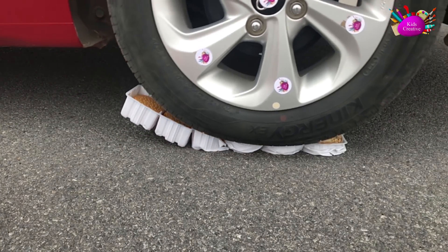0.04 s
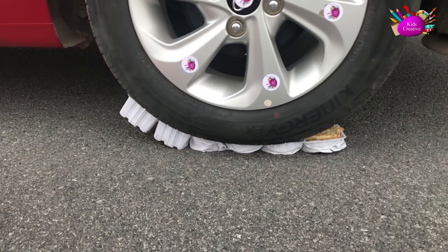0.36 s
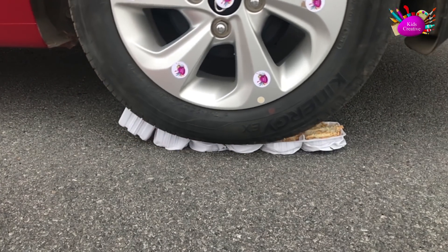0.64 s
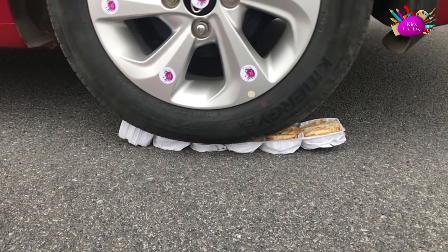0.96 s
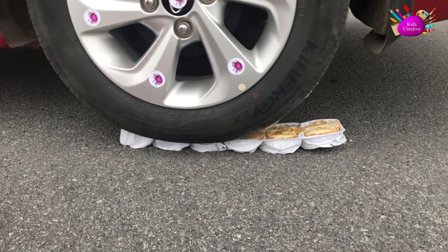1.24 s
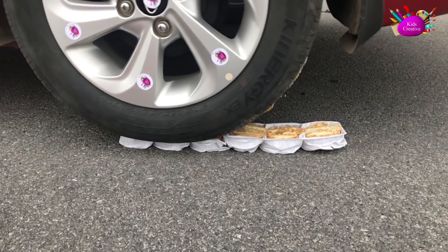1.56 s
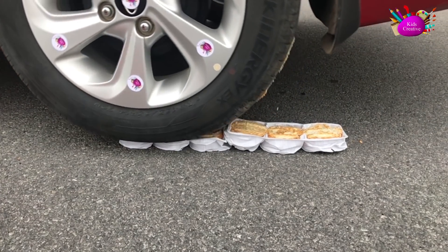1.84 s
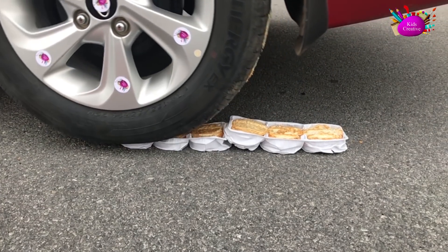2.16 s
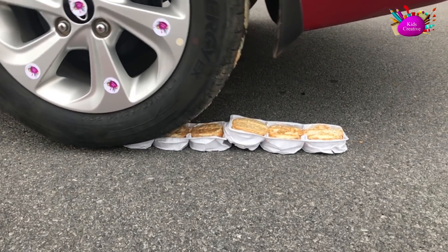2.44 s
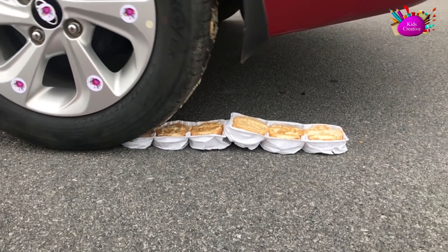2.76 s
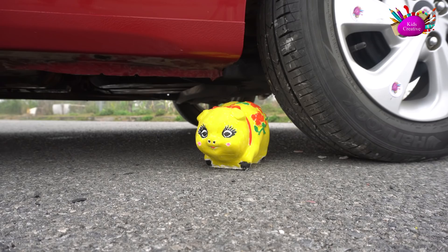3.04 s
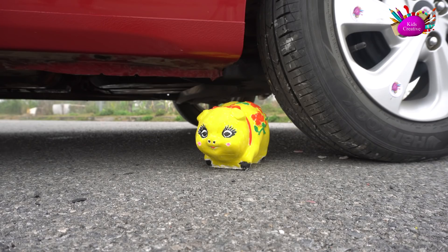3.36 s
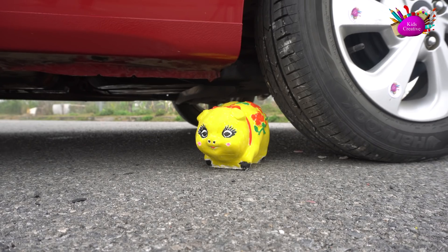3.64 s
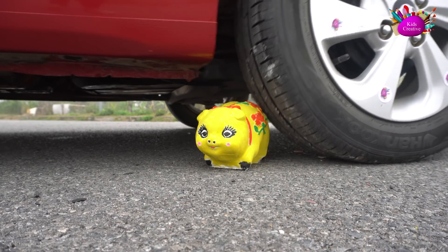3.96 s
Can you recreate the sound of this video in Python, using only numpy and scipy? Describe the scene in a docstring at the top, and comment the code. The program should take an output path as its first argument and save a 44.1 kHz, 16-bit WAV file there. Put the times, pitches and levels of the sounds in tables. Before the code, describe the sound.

A car tyre crushes plastic trays with dull pops and crackles, before a nearby engine idles.

```python
"""Filled plastic trays crush under a slow car tyre on asphalt, heard dull and in mono.
Tray walls buckle with hollow pops, film cracks and crumples over a faint engine throb,
and the crackle thins as the tyre rolls off. Then an abrupt cut to the car idling close by,
bright and in stereo: clatter and hiss ring the engine bay, with one sharp tick."""
import sys
import numpy as np
from scipy import signal
from scipy.fft import rfft, irfft
from scipy.io import wavfile
from scipy.ndimage import uniform_filter1d

SR = 44100
rng = np.random.default_rng(int(sys.argv[2]) if len(sys.argv) > 2 else 0)


def transcribe(signal):
    """Save signal, clipped to [-1, 1], as a 16-bit WAV file at the path in sys.argv[1]."""
    frames = np.atleast_2d(signal).T
    limited = np.clip(frames, -1, 1)
    pcm = np.round(limited * 32767).astype(np.int16)
    wavfile.write(sys.argv[1], SR, pcm)


N = 176400
CUT_S, DULL_HZ, BANDWIDTH_HZ = 3.1095, 4720, 15900

# engine while rolling: freq_hz, gain_db
RUMBLE_SPECTRUM = [(8, -6.5), (25, 0.5), (40, -10), (60, -13.5), (90, -13), (130, -24.5), (220, -17),
                   (330, -23), (600, -30.5), (1200, -38), (4700, -45)]
# engine at idle: freq_hz, gain_db
IDLE_SPECTRUM = [(20, -36), (40, -22), (65, -3.5), (95, -7), (160, -8.5), (250, -3), (370, -3), (560, -3),
                 (780, 1.5), (1020, -3.5), (1300, -4.5), (1800, -3), (2100, -9.5), (2800, -13.5),
                 (4600, -16.5), (5500, -22), (10000, -24), (15500, -29.5)]
# engine bay resonances: freq_hz, half_width_hz, relative_db
BAY_MODES = [(98, 8, -49), (304, 8, -42), (447, 8, -47), (614, 12, -48), (732, 10, -39), (865, 10, -40),
             (918, 12, -44), (1226, 16, -49), (1334, 24, -46), (1536, 26, -44), (1668, 26, -42),
             (1766, 20, -43), (1830, 26, -44)]
# left-right likeness of the idle: freq_hz, coherence
IDLE_COHERENCE = [(130, 1), (300, 0.99), (640, 0.86), (1000, 0.73), (1500, 0.15), (3000, 0.1), (7000, 0.15),
                  (15000, 0.4)]
# idle balance: freq_hz, left_minus_right_db
IDLE_BALANCE = [(200, 0), (500, 0), (800, 4), (1600, 8), (2100, 3.5), (5000, 3.5), (15000, 1.5)]
# idle phase: freq_hz, left_lead_rad
IDLE_PHASE = [(100, 0.039), (950, 0.077), (1700, 0.91), (2500, 0.74), (5000, 2.4), (9000, 0.57)]
# onset of the tick: freq_hz, gain_db
SNAP_SPECTRUM = [(300, -15), (1200, 2), (2500, 8), (5000, -10), (11000, -12), (16000, -19)]
# steady crushing: time_s, crumple_db, crackle_db
CRUSH_LEVELS = [(0, -45.5, -45.5), (0.149, -37.5, -44.5), (.3, -39, -47), (0.421, -42.5, -42.5),
                (.65, -35.5, -46), (0.799, -43.5, -45.5), (.9, -37.5, -45.5), (1.04, -42.5, -48.5),
                (1.12, -39.5, -45.5), (1.35, -42, -45), (1.52, -40.5, -47.5), (1.65, -43.5, -46.5),
                (1.8, -52, -48.5), (2.129, -49.5, -48), (2.28, -47.5, -51), (2.36, -59, -52),
                (2.5, -58.5, -55.5), (2.8, -57, -61.5), (3.1, -55.5, -65)]
# low crumple: freq_hz, gain_db
CRUMPLE_SPECTRUM = [(40, -18), (85, -9), (150, -3), (250, 1.5), (450, -3), (800, -6.5), (1200, -15.5),
                    (1600, -9.5), (2500, -27.5), (4700, -48.5)]
# fine crackle: freq_hz, gain_db
CRACKLE_SPECTRUM = [(300, -17.5), (900, 1), (1600, 0), (2400, 0.5), (3500, 3), (4600, 4.5)]
# trays folding: start_s, length_s, pitch_hz, peak_rms_db
TRAY_FOLDS = [(0.127, 0.047, 334, -39.5), (0.19, 0.029, 600, -35.5), (.41, 0.026, 453, -34.5),
              (0.437, 0.035, 263, -32.5), (.51, 0.039, 597, -35.5), (0.563, 0.064, 470, -38),
              (0.848, 0.049, 690, -37.5), (0.896, 0.048, 670, -35.5), (1.087, 0.058, 260, -34),
              (1.369, 0.049, 365, -34.5), (1.424, 0.035, 430, -30), (1.606, 0.032, 600, -38),
              (1.686, 0.038, 400, -41.5), (1.84, 0.057, 603, -43.5), (2.198, 0.067, 650, -37.5)]
# film cracking: freq_hz, gain_db
CRACK_SPECTRUM = [(200, -11.5), (700, -4.5), (1600, 2), (2500, -4), (3600, -1), (4700, -1)]
# walls buckling: start_s, pitch_hz, pop_relative_db, decay_ms, crack_hz, crack_relative_db
WALL_BUCKLES = [(0.023, 410, -31.5, 2.7, 4100, -29.5), (0.088, 940, -24, 2.6, 1700, -38),
                (0.143, 1084, -25.5, 3.2, 3000, -26), (0.16, 960, -27, 1.7, 1700, -30),
                (0.183, 344, -15.5, 3.6, 2100, -41), (0.19, 1020, -20, 1.7, 1300, -20.5),
                (0.209, 1100, -29, 2, 1900, -28), (0.24, 426, -21.5, 8.7, 1400, -39),
                (0.276, 1114, -21, 1.6, 1600, -15), (0.299, 330, -19.5, 2, 1600, -21),
                (0.328, 278, -18, 3.2, 1500, -25.5), (0.406, 690, -15, 0.89, 1300, -21),
                (0.4857, 776, -16.5, 1.1, 1700, -15), (0.521, 670, -31.5, 1.6, 1700, -23),
                (0.558, 394, -15.5, 3.4, 2800, -21.5), (0.598, 507, -17, 2.7, 3300, -29.5),
                (0.633, 704, -29, 3, 1600, -15.5), (0.72, 248, -16, 6.7, 1700, -26.5),
                (0.75, 407, -34.5, 2, 1500, -26.5), (0.837, 680, -16.5, 1.7, 1500, -37),
                (0.911, 665, -19, 3.1, 1900, -28), (0.973, 1030, -29.5, 3.1, 1400, -37),
                (1.013, 428, -15.5, 3.7, 1400, -42), (1.063, 360, -33, 4.5, 1800, -46),
                (1.081, 292, -13, 3.6, 4400, -27.5), (1.136, 257, -32, 2, 3500, -20.5),
                (1.177, 450, -46, 1.9, 4400, -29), (1.208, 954, -28, 2.4, 3500, -34),
                (1.231, 300, -26.5, 3.2, 1500, -27), (1.268, 271, -21, 6.3, 1700, -20),
                (1.337, 319, -29, 3.2, 1700, -22), (1.363, 320, -20, 5.7, 1600, -33),
                (1.416, 480, -21, 2, 4400, -24), (1.5, 330, -25.5, 2, 1600, -30.5),
                (1.592, 338, -20, 3.9, 3100, -31), (1.605, 536, -27, 4, 2500, -33),
                (1.673, 348, -14.5, 4.6, 1600, -40), (1.871, 840, -22, 0.89, 1400, -35),
                (1.908, 676, -26.5, 2.5, 3900, -33.5), (2.015, 656, -24, 3, 1300, -37),
                (2.026, 580, -34, 1.3, 4300, -29), (2.054, 500, -19, 2, 4400, -51),
                (2.121, 1030, -31, 3.7, 4400, -42), (2.161, 446, -25, 2.7, 1600, -46),
                (2.202, 940, -32, 2.3, 1600, -30), (2.271, 1590, -27.5, 1.4, 4300, -23),
                (2.489, 890, -56, 1.5, 3900, -35), (2.647, 1200, -48, 1.7, 1400, -47),
                (2.705, 900, -56, 2, 4200, -32.5), (2.73, 1060, -29.5, 2.1, 1300, -35),
                (2.82, 560, -40, 2.6, 3800, -41), (2.962, 700, -44, 1.9, 3900, -41),
                (3.014, 930, -41.5, 1.6, 1600, -38), (3.086, 1440, -51, 2, 2900, -28)]


def amp(db):
    return 10 ** (np.asarray(db) / 20)


def unit_rms(x):
    return x / np.sqrt(np.mean(x ** 2) + 1e-20)


def curve_at(points, hz):
    """Interpolate over log frequency."""
    freq_hz, value = np.transpose(points)
    return np.interp(np.log(hz + 1), np.log(freq_hz + 1), value)


def add(mix, start_s, sound):
    part = mix[max(round(start_s * SR), 0):][:len(sound)]
    part += sound[:len(part)]


def colour(x, spectrum):
    """Minimum-phase filter of unit energy."""
    size = 4096
    log_gain = np.log(amp(curve_at(spectrum, abs(np.fft.fftfreq(size, 1 / SR)))))
    response = np.exp(np.conj(signal.hilbert(log_gain)))
    taps = np.fft.ifft(response).real[:size // 2]
    return signal.fftconvolve(x, taps / np.linalg.norm(taps))[:len(x)]


def resonate(x, hz, q):
    return signal.lfilter(*signal.iirpeak(hz, q, SR), x)


def lowpass(channels, hz):
    taps = signal.firwin(601, hz, window=("kaiser", 8), fs=SR)
    return signal.oaconvolve(channels, taps[None], "same", axes=1)


def dull_unit_rms(x):
    return unit_rms(lowpass(x[None], DULL_HZ)[0])


def clicks(samples, per_s, spread_db):
    """Random impulses of either sign, exponentially distributed in dB."""
    chance, size, sign = rng.random((3, samples))
    level_db = spread_db * np.minimum(-np.log(1 - size), 5)
    return (chance < per_s / SR) * np.sign(sign - .5) * amp(level_db)


def burst(x, envelope):
    """Give x the envelope's shape and energy."""
    shaped = x * envelope
    return shaped * np.linalg.norm(envelope) / (np.linalg.norm(shaped) + 1e-12)


def wander(step_s):
    """Random drift of unit rms."""
    knots = rng.standard_normal(N // 64)
    return unit_rms(np.interp(np.arange(N) / SR / step_s, np.arange(len(knots)), knots))


def engine_rumble():
    """The engine throbs faintly while the car creeps."""
    gain = amp(curve_at(RUMBLE_SPECTRUM, np.fft.rfftfreq(N, 1 / SR)))
    noise = irfft(rfft(rng.standard_normal(N)) * gain, N)
    throb_hz = 22.5 * (1 + 0.079 * wander(step_s=.12))
    throb = np.sin(2 * np.pi * np.cumsum(throb_hz) / SR)
    return amp(-48) * unit_rms(noise) + amp(-45) * throb


def engine_idle():
    """Quick regular clatter and fluttering hiss excite the engine bay; stereo."""
    clatter_hz, decay_cycles, flutter_db = 79.8, 0.083, 1.04
    t, hz = np.arange(N) / SR, np.fft.rfftfreq(N, 1 / SR)
    beats = 1 + 0.95 * np.exp(-(t * clatter_hz % 1) / decay_cycles)
    flutter = amp(flutter_db * unit_rms(uniform_filter1d(rng.standard_normal(N), size=700)))
    clatter = rfft(unit_rms(rng.standard_normal((2, N)) * beats))
    hiss = rfft(unit_rms(rng.standard_normal((2, N)) * flutter))
    clatter_share = curve_at([(150, 0.076), (600, 1), (2000, 0.84), (5000, 0.21)], hz)
    left, independent = np.sqrt(clatter_share) * clatter + np.sqrt(1 - clatter_share) * hiss
    power = (amp(-27) * unit_rms(amp(curve_at(IDLE_SPECTRUM, hz)))) ** 2
    for mode_hz, half_width_hz, relative_db in BAY_MODES:
        peak = 1 / (1 + ((hz - mode_hz) / half_width_hz) ** 2)
        power += (amp(relative_db + 1) * unit_rms(peak)) ** 2
    coherence = curve_at(IDLE_COHERENCE, hz)
    right = coherence * left + np.sqrt(1 - coherence ** 2) * independent
    right *= np.exp(-1j * curve_at(IDLE_PHASE, hz))
    lean = amp(curve_at(IDLE_BALANCE, hz) / 2)
    return irfft(np.sqrt(power) * np.array([left * lean, right / lean]), N)


def tick():
    """One sharp tick, like grit snapping under the tread, and its quick reflection."""
    start_s, echo_delay_s = 3.901, .0092
    ring_hz, ring_decay_s, snap_decay_s = 1160, .0032, .0005
    out, t = np.zeros((2, N)), np.arange(SR // 20) / SR
    ring = amp(-15) * np.sin(2 * np.pi * ring_hz * t) * np.exp(-t / ring_decay_s)
    for side, gain in zip(out, amp([2, -2])):
        noise = colour(rng.standard_normal(len(t)), SNAP_SPECTRUM)
        snap = amp(-12) * burst(noise, np.exp(-t / snap_decay_s))
        add(side, start_s, gain * (ring + snap))
        add(side, start_s + echo_delay_s, gain * amp(-7) * ring)
    return out


def underbody(x):
    """Add short reflections between road and car floor."""
    gap_s, t60_s = .003, 0.15
    t = np.arange(SR // 4) / SR
    tail = clicks(len(t), per_s=2000, spread_db=3.5) * amp(-60 * t / t60_s) * (t > gap_s)
    return x + amp(-11.5) * signal.fftconvolve(x, tail / np.linalg.norm(tail))[:N]


def crushing():
    """Film and grit crumple and crackle under the tread in small flurries."""
    time_s, crumple_db, crackle_db = np.transpose(CRUSH_LEVELS)
    t = np.arange(N) / SR
    flurry = amp(1.5 * wander(step_s=.008))
    crumple = colour(flurry * clicks(N, per_s=1700, spread_db=3.5), CRUMPLE_SPECTRUM)
    crackle = colour(flurry * clicks(N, per_s=5000, spread_db=2), CRACKLE_SPECTRUM)
    return (dull_unit_rms(crumple) * amp(np.interp(t, time_s, crumple_db))
            + dull_unit_rms(crackle) * amp(np.interp(t, time_s, crackle_db)))


def tray_scrunches():
    """Runs of small slips ring the hollow of a folding tray."""
    out = np.zeros(N)
    for start_s, length_s, pitch_hz, peak_rms_db in TRAY_FOLDS:
        slips = clicks(SR // 8, per_s=1500, spread_db=1.0)
        hollow = resonate(resonate(slips, pitch_hz, q=1.4), pitch_hz, q=0.44)
        progress = np.minimum(np.arange(len(slips)) / SR / length_s, 1)
        swell = np.sqrt(abs(np.sin(np.pi * progress ** 0.43)))
        add(out, start_s, amp(peak_rms_db) * unit_rms(hollow) * swell)
    return out


def film_crack(t, pitch_hz):
    """Film tears in a burst of clicks with trailing splinters."""
    crack_decay_s, splinter_decay_s = 0.002, 0.0071
    tears = colour(clicks(len(t), per_s=14000, spread_db=-0.5), CRACK_SPECTRUM)
    film = dull_unit_rms(resonate(tears, pitch_hz, q=3.1) + amp(-6.5) * tears)
    return burst(film, np.exp(-t / crack_decay_s) + amp(-13.5) * np.exp(-t / splinter_decay_s))


def wall_pop(t, pitch_hz, decay_s):
    """A wall snaps through: a tone that starts sharp and settles, a shorter upper mode, a rattle."""
    sharp_share, settle_s, rise_s, rattle_decay_s = 0.24, 0.0005, 0.00065, 0.0036
    phase = 2 * np.pi * pitch_hz * (t + sharp_share * settle_s * (1 - np.exp(-t / settle_s)))
    envelope = (1 - np.exp(-t / rise_s)) * np.exp(-t / decay_s)
    envelope /= envelope.max()
    tone = -np.sin(phase) * envelope - amp(-11.5) * np.sin(2.225 * phase) * envelope ** 2
    noise = resonate(rng.standard_normal(len(t)), pitch_hz, q=1.0)
    rattle = burst(noise, np.exp(-t / rattle_decay_s))
    return amp(-1) * tone + amp(-11.5) * rattle


def tray_buckles():
    """Each wall gives way under the tyre with a hollow pop and a crack."""
    out, t = np.zeros(N), np.arange(SR // 16) / SR
    for start_s, pitch_hz, pop_relative_db, decay_ms, crack_hz, crack_relative_db in WALL_BUCKLES:
        pop = amp(pop_relative_db) * wall_pop(t, pitch_hz, decay_ms / 1000)
        crack = amp(crack_relative_db - 6) * film_crack(t, crack_hz)
        add(out, start_s, pop + crack)
    return out


def scene():
    """Dull mono crushing, then a hard cut to the bright stereo idle."""
    trays = underbody(tray_buckles() + tray_scrunches()) + crushing()
    rolling = lowpass((trays + engine_rumble())[None], DULL_HZ)
    return np.where(np.arange(N) / SR < CUT_S, rolling, engine_idle() + tick())


def record(dry):
    """Steep treble limit."""
    return lowpass(dry, BANDWIDTH_HZ)


dry = scene()
out = record(dry)
transcribe(out)
```